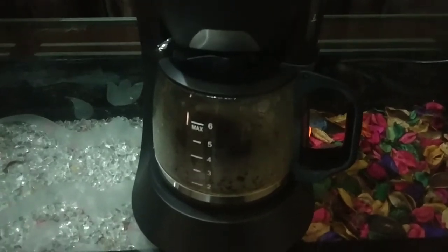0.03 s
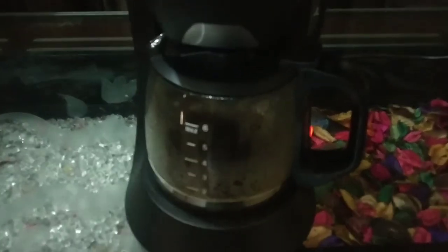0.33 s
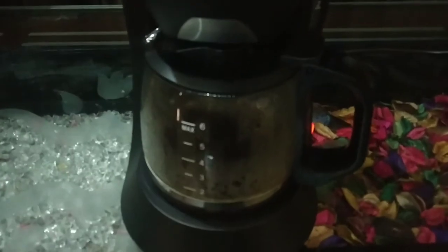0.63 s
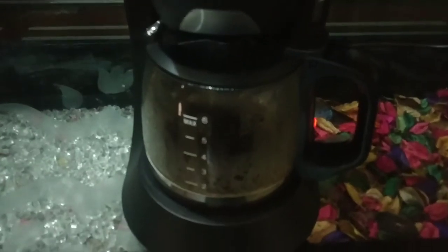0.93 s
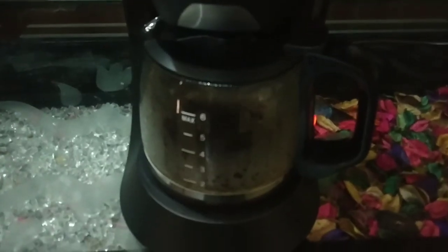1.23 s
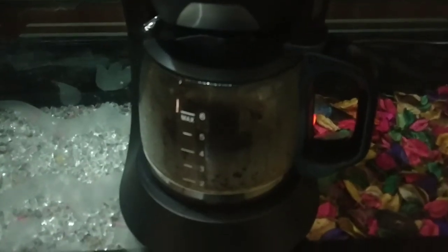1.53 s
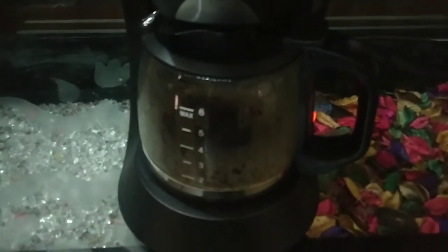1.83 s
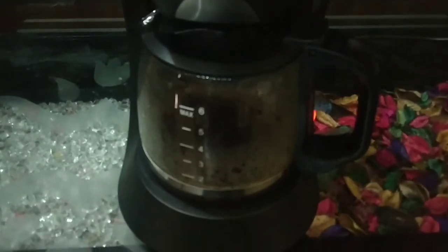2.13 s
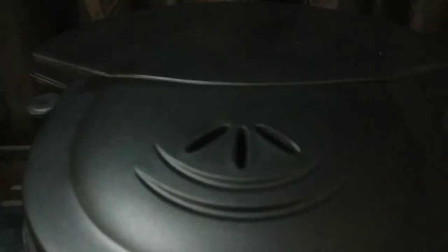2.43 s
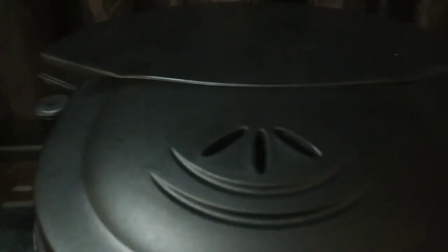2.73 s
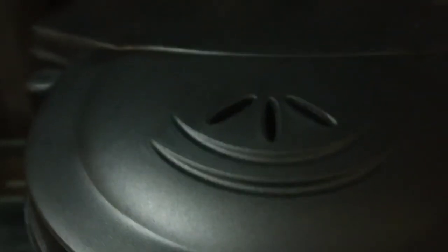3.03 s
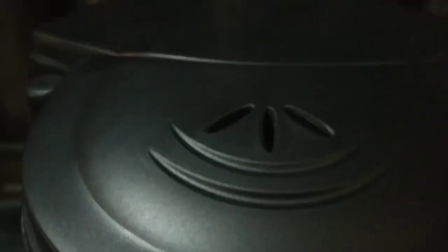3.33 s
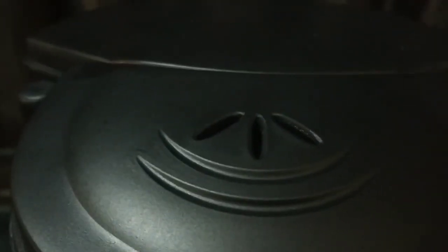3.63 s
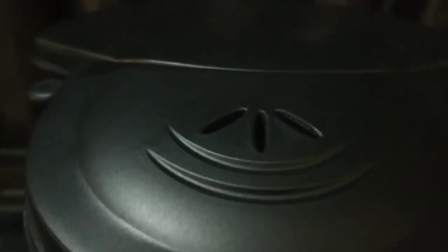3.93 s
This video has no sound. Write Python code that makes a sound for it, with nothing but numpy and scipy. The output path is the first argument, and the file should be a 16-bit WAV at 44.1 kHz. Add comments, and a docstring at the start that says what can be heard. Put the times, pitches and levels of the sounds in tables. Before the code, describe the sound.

A drip coffee maker spits, drips and simmers, heard close beside its glass carafe in a small room, with soft steam hisses and muffled gurgles. At about 2.3 seconds the sound breaks briefly and resumes above the lid: a louder boiling rumble with quick, irregular thumps. Short steam puffs come from 3 to 4 seconds. Fingers lightly tap and brush the microphone on the left near 1 and 2.6 seconds.

```python
"""Hot water spits and simmers into the filter of a drip coffee maker, heard beside the carafe in a small
room. Each bubble rings as a damped oscillator, and its spray excites the modes of the glass.
After a short break the listener is above the lid: collapsing steam bubbles thump in the tank over a
boiling rumble, and turbulent steam puffs through the vents. Now and then fingers brush and tap the
left microphone port."""
import sys
import numpy as np
from scipy import signal
from scipy.fft import rfft, irfft, next_fast_len
from scipy.io import wavfile
from scipy.ndimage import map_coordinates

SR = 44100
rng = np.random.default_rng(int(sys.argv[2]) if len(sys.argv) > 2 else 0)


def to_wav(sig):
    """Store sig (one row per channel, or 1-D mono) as 16-bit WAV at the path in sys.argv[1].

    Samples outside -1..1 are clipped; the rate is SR.
    """
    pcm = np.clip(np.atleast_2d(sig), -1, 1) * 32767
    pcm = np.round(pcm).astype(np.int16)
    wavfile.write(sys.argv[1], SR, pcm.T)  # frames by channels


N = 176400
TIME_S = np.arange(N) / SR
CARAFE_END_S, LID_START_S = 2.323, 2.368
ONSET_S, LOW_CUT_HZ = 0.0015, 194  # of gurgles and thumps


def amp(db):
    return 10 ** (np.asarray(db) / 20)

def unit_rms(x):
    return x / np.sqrt(np.mean(x ** 2) + 1e-20)

def unit_peak(x):
    return x / np.abs(x).max()

def pan(left_over_right_db):
    return amp(np.array([[left_over_right_db], [-left_over_right_db]]) / 2)

def on_log_axis(points, hz):
    knots_hz, values = np.transpose(points)
    return np.interp(np.log(hz + 1), np.log(knots_hz + 1), values)

def gain_curve(points):
    return amp(np.interp(TIME_S, *np.transpose(points)))

def add(track, start_s, x):
    part = track[:, max(0, round(start_s * SR)):][:, :x.shape[-1]]
    part += x[..., :part.shape[1]]

def filtered(x, response):
    size = next_fast_len(N + SR // 2)
    return irfft(rfft(x, size) * response(np.fft.rfftfreq(size, 1 / SR)), size)[..., :N]

def low_cut(x, hz, order=2):
    return signal.sosfilt(signal.butter(order, hz, "highpass", fs=SR, output="sos"), x)

def wobble(knots_per_s):
    """Random modulation: a spline through Gaussian values."""
    return map_coordinates(rng.standard_normal(2000), [np.arange(N) * knots_per_s / SR], mode="wrap")

def resonate(x, modes):
    """Forced vibration: each mode adds a second-order resonance to the direct sound."""
    def response(f):
        return sum(amp(db) * 1j * f * width / (hz ** 2 - f * f + 1j * f * width)
                   for hz, width, db in modes)
    return x + filtered(x, response)

# Likeness of left and right: frequency_hz, correlation
COHERENCE = [(750, 0.9), (7000, 0)]
def seethe(spectrum, pops_per_s, pop_db, pan_db):
    """Shot noise plus Gaussian noise, shaped into a partly coherent stereo rush of rms 1."""
    pops = (rng.random((2, N)) < pops_per_s / SR) * rng.standard_normal((2, N))
    source = rng.standard_normal((2, N)) + amp(pop_db) * unit_rms(pops)
    def response(hz):
        angle = np.arccos(on_log_axis(COHERENCE, hz)) / 2
        bass_rolloff = np.minimum(1, hz / spectrum[0][0]) ** 7.4
        return amp(on_log_axis(spectrum, hz)) * bass_rolloff * [np.cos(angle), np.sin(angle)]
    mid, side = filtered(source, response)
    return unit_rms(np.array([mid + side, mid - side]) * pan(pan_db))

def swells(rows, rise, fall):
    """Trapezoidal envelopes; rise and fall are shares of each duration."""
    envelope = np.zeros(N)
    for start_s, duration_s, db in rows:
        progress = (TIME_S - start_s) / duration_s
        envelope += amp(db) * np.clip(np.minimum(progress / rise, (1 - progress) / fall), 0, 1)
    return envelope

# Reverberation time: frequency_hz, t60_s
ROOM_DECAY = [(200, 0.069), (9000, 0.25)]
def room(x, tail_db=-9.5):
    """Reverberation: a diffuse, exponentially decaying tail joins the direct sound."""
    hz, t, noise = signal.stft(rng.standard_normal((2, SR // 3)), SR, nperseg=256)
    decay = amp(-60 * t / on_log_axis(ROOM_DECAY, hz)[:, None])
    tail = signal.istft(noise * decay, SR, nperseg=256)[1]
    return x + amp(tail_db) * signal.fftconvolve(x, tail / np.linalg.norm(tail[0]), axes=1)[:, :N]

# Hiss spectrum: frequency_hz, gain_db
HISS_SPECTRUM = [(9000, -18), (14000, 16)]
def high_hiss(level_db=-51, fall_db_per_s=4):
    """Exponential decay: a faint band of treble noise dies slowly away."""
    gain = amp(level_db - fall_db_per_s * TIME_S)
    return gain * seethe(HISS_SPECTRUM, pops_per_s=830, pop_db=-22, pan_db=7)

# Strength of the muffled boil: time_s, level_db
HOUSING_ENVELOPE = [(0, -45), (.4, -41.5), (1.98, -41.5), (2.2, -35), (2.32, -42.5)]
# Its spectrum: frequency_hz, gain_db
HOUSING_SPECTRUM = [(150, -20), (195, -5.5), (430, -3.5), (560, -19.5), (730, -10.5), (1200, -29.5),
                    (2400, -62)]
def muffled_boil():
    """Transmission loss: the housing passes mainly the low frequencies of the boil."""
    gain = gain_curve(HOUSING_ENVELOPE) * amp(1.3 * wobble(16))
    return gain * seethe(HOUSING_SPECTRUM, pops_per_s=130, pop_db=-3.5, pan_db=0)

# Simmering water: frequency_hz, gain_db
SIMMER_SPECTRUM = [(600, -32), (930, 1), (1120, -6), (1380, -2.5), (1690, 2), (1900, -11.5), (2400, -5.5),
                   (4700, -3), (6000, -9.5), (10000, -20)]
def simmer(level_db=-44):
    """Incoherent summation: tiny pops merge into a flickering rush."""
    gain = amp(level_db + wobble(40.5))
    return gain * seethe(SIMMER_SPECTRUM, pops_per_s=220, pop_db=-2.5, pan_db=4.5)

# Fizz in the tank: frequency_hz, gain_db
FIZZ_SPECTRUM = [(2000, -7), (6000, 1.5), (7000, -10.5), (15500, -27.5)]
# Resonances under the lid: frequency_hz, bandwidth_hz, gain_db
LID_MODES = [(2560, 190, 8.5), (5450, 150, 2)]
def lid_fizz(gain_db=-18.5):
    """Cavity resonance: the space under the lid colours a fine fizz."""
    gain = amp(gain_db + wobble(8.7))
    fizz = seethe(FIZZ_SPECTRUM, pops_per_s=260, pop_db=-2.5, pan_db=4)
    return gain * unit_rms(resonate(fizz, LID_MODES))

# Boiling in the tank: frequency_hz, gain_db
RUMBLE_SPECTRUM = [(175, -12), (245, -0.5), (335, -0.5), (460, -10), (585, 5), (720, -1), (1150, -23.5),
                   (3500, -45)]
def tank_rumble():
    """Superposition: countless small collapses sum to a low rumble."""
    return amp(wobble(45)) * seethe(RUMBLE_SPECTRUM, pops_per_s=400, pop_db=-3, pan_db=-1.8)

# Puffs at the spout: start_s, duration_s, level_db
SPOUT_JETS = [(.22, 0.21, -39.5), (1.318, 0.11, -42.5), (1.78, 0.23, -39.5), (2.01, 0.58, -39.5)]
# Their spectrum: frequency_hz, gain_db
SPOUT_SPECTRUM = [(350, -1.5), (900, -4), (2000, -9), (5300, -8.5), (10000, -32)]
def spout_steam():
    """Turbulence: steam leaves the spout as fluttering broadband noise."""
    envelope = swells(SPOUT_JETS, rise=0.17, fall=0.21) * amp(2.5 * wobble(90))
    return envelope * seethe(SPOUT_SPECTRUM, pops_per_s=500, pop_db=-3, pan_db=4.5)

# Puffs at the vents: start_s, duration_s, level_db
VENT_JETS = [(3.06, 0.12, -35), (3.315, 0.086, -36), (3.43, 0.13, -38), (3.567, 0.061, -36.5),
             (3.68, 0.054, -30.5), (3.97, 0.06, -39)]
# Their spectrum: frequency_hz, gain_db
VENT_SPECTRUM = [(1200, 0), (1900, -4), (4800, -2.5), (13000, -19.5)]
# Vent resonances: frequency_hz, bandwidth_hz, gain_db
VENT_MODES = [(1375, 170, 9), (3710, 75, 13), (4380, 126, 15.5)]
def vent_steam():
    """Flow-excited resonance: jets of steam drive the modes of the vents."""
    jet = seethe(VENT_SPECTRUM, pops_per_s=310, pop_db=-8.5, pan_db=5)
    return swells(VENT_JETS, rise=0.17, fall=0.77) * unit_rms(resonate(jet, VENT_MODES))

def bubble_tones(rows, t60_s=0.03):
    """Bubble resonance: each pulsating bubble radiates a damped sinusoid."""
    out, t = np.zeros((2, N)), np.arange(SR // 10) / SR
    envelope = amp(-60 * t / t60_s) * (1 - np.exp(-t / ONSET_S))
    for start_s, db, hz in rows:
        add(out, start_s, amp(db) * unit_peak(envelope * np.sin(2 * np.pi * hz * t)))
    return out

# Bubbles behind the housing: start_s, level_db, pitch_hz
LARGE_BUBBLES = [(.206, -31.5, 905), (.258, -29.5, 895), (.401, -28.5, 654), (2.075, -28, 585),
                 (2.183, -23.5, 353), (2.213, -24.5, 686), (2.228, -22, 370)]
def gurgles():
    """Minnaert resonance: larger bubbles ring lower, dull behind the plastic."""
    return low_cut(bubble_tones(LARGE_BUBBLES), LOW_CUT_HZ)

def tank_bubbles(per_s=32, gain_db=10.5, lowest_hz=512):
    """Size scaling: over one octave, smaller bubbles ring higher and tend to be weaker."""
    draws = rng.random((int(per_s * N / SR), 3))
    return bubble_tones([(when * N / SR, gain_db - 10 * (weakness + octave), lowest_hz * 2 ** octave)
                         for when, weakness, octave in draws])

# Taps on the port: start_s, level_db, pitch_hz
FINGER_TAPS = [(0.9353, -4, 427), (2.5982, -6, 650), (2.6997, -7.5, 810)]
# Strokes across it: start_s, duration_s, level_db
FINGER_STROKES = [(.965, 0.22, -33), (1.432, 0.0062, -34.5), (2.548, 0.081, -37)]
# Sliding skin: frequency_hz, gain_db
FRICTION_SPECTRUM = [(3000, -5), (7000, 0.5), (15500, -4.5)]
def fingers(tap_t60_s=0.003):
    """Impact and friction: skin taps and brushes unevenly at the left microphone port."""
    out, t = np.zeros((2, N)), np.arange(SR // 40) / SR
    for start_s, db, hz in FINGER_TAPS:
        knock = np.sin(2 * np.pi * hz * t) + 0.11 * rng.standard_normal(len(t))
        knock = low_cut(knock * amp(-60 * t / tap_t60_s), hz / 2)
        add(out, start_s, amp(db - 13) * unit_peak(knock) * pan(23))
    grip = swells(FINGER_STROKES, rise=0.2, fall=0.25) * amp(1.6 * wobble(70))
    return out + grip * seethe(FRICTION_SPECTRUM, pops_per_s=2800, pop_db=-3, pan_db=22)

def drip_events(per_s=32, level_db=-35, puff_boost_db=4, lowest_hz=1288, octaves=1.4, spray_db=-12):
    """Random point process: rows of small drips, stronger during a puff at the spout."""
    draws = rng.random((int(per_s * CARAFE_END_S), 3)) * [CARAFE_END_S, 1, 1]
    for start_s, weakness, pitch in draws:
        puffing = any(onset < start_s < onset + duration for onset, duration, _ in SPOUT_JETS)
        db = level_db - 10 * weakness + puff_boost_db * puffing
        yield start_s, db, lowest_hz * 2 ** (octaves * pitch ** 2), spray_db

# Bursts at the spout: start_s, level_db, pitch_hz, spray_gain_db
SPOUT_BURSTS = [(.028, -24.5, 1290, -7), (.363, -23, 1417, -3.5), (.5125, -26.5, 1456, -13.5),
                (.578, -25, 1300, -8.5), (.8078, -19.5, 1344, -8.5), (1.0724, -24, 1255, -3),
                (1.349, -23.5, 1260, -11), (1.3805, -22.5, 1640, -23.5), (1.4707, -23.5, 1420, -27),
                (1.6192, -26, 1386, -11.5), (1.6835, -15, 1447, -15.5), (1.8507, -23, 1670, -5.5),
                (1.9317, -21, 1670, -16.5), (2.0178, -27.5, 1610, -6.5)]
# Their spray: frequency_hz, gain_db
SPRAY_SPECTRUM = [(1300, 6), (2600, 0), (6300, 2.5), (10000, -26)]
# Carafe resonances: frequency_hz, bandwidth_hz, gain_db
GLASS_MODES = [(5310, 220, 10), (5676, 92, 2), (7194, 86, 9.5)]
def spits(attack_s=0.003, hold_s=0.0031, t60_s=0.02, tone_db=-5):
    """Transient excitation: each burst or drip rings at its own pitch; its spray rings the glass."""
    tones, splashes, t = np.zeros((2, N)), np.zeros((2, N)), np.arange(SR // 20) / SR
    rise = np.sin(np.pi / 2 * np.minimum(t / attack_s, 1)) ** 2
    envelope = rise * amp(-60 * np.maximum(t - attack_s - hold_s, 0) / t60_s)
    spray = seethe(SPRAY_SPECTRUM, pops_per_s=3400, pop_db=-4, pan_db=15.5)
    for start_s, db, hz, spray_db in [*SPOUT_BURSTS, *drip_events()]:
        phase_drift = 0.085 * np.cumsum(rng.standard_normal(len(t)))
        add(tones, start_s, amp(db + tone_db) * envelope * np.sin(2 * np.pi * hz * t + phase_drift))
        splash = spray[:, round(start_s * SR):][:, :len(t)]
        add(splashes, start_s, amp(db + spray_db) * envelope * splash)
    return tones + resonate(splashes, GLASS_MODES)

# Collapsing steam bubbles: start_s, level_db, lowest_mode_gain_db
COLLAPSES = [(2.4326, -20, -2.5), (2.4938, -14.5, -5.5), (2.5622, -10, -6), (2.5832, -12, -7.5),
             (2.6692, -10.5, -0.5), (2.7325, -7, -7.5), (2.8772, -9.5, -10.5), (2.8955, -10.5, -2.5),
             (2.9443, -8, -7), (3.0037, -8.5, -15), (3.091, -12, -6), (3.1685, -5.5, -7.5),
             (3.2555, -6, -6.5), (3.412, -16, -24), (3.4506, -6, -1.5), (3.6182, -8.5, -11),
             (3.688, -15, 15), (3.8192, -9, -3.5), (3.826, -13.5, -27), (3.9372, -6.5, -8),
             (3.9692, -8.5, -8.5)]
# Tank resonances: frequency_hz, gain_db, t60_s
TANK_MODES = [(281.7, 6, 0.025), (600, 7, 0.025), (889, -8.5, 0.022), (2577, -23.5, 0.035),
              (5500, -38, 0.028)]
def thumps(stretch_per_db=0.05):
    """Modal ringing: each collapse strikes the tank, slightly detuned; strong ones ring longer."""
    out, t = np.zeros((2, N)), np.arange(SR // 10) / SR
    mean_db = np.mean([db for _, db, _ in COLLAPSES])
    for start_s, db, lowest_mode_db in COLLAPSES:
        age = t / np.exp(stretch_per_db * max(db - mean_db, 0))
        detune = 1 + 0.03 * rng.standard_normal(len(TANK_MODES))
        ring = np.zeros(len(t))
        for k, (hz, mode_db, t60_s) in enumerate(TANK_MODES):
            gain = amp(mode_db) * (-amp(lowest_mode_db) if k == 0 else 1)  # lowest mode in antiphase
            ring += gain * np.sin(2 * np.pi * hz * detune[k] * t) * amp(-60 * age / t60_s)
        ring = low_cut(ring * (1 - np.exp(-age / ONSET_S)), LOW_CUT_HZ, order=3)
        add(out, start_s, amp(db) * unit_peak(ring) * pan(-1.9))
    return out

def beside_carafe(fade_s=0.017):
    """Direct and reverberant sound: spits and gurgles excite the room over a bed of noise."""
    bed = muffled_boil() + simmer() + spout_steam() + high_hiss()
    fade_out = np.clip((CARAFE_END_S - TIME_S) / fade_s, 0, 1)
    return (bed + room(spits() + gurgles())) * fade_out

# Strength of the boil above the lid: time_s, level_db
TANK_ENVELOPE = [(2.36, -36.5), (3.0, -27)]
def above_lid(fade_s=0.18, left_lag_s=0.000098):
    """Arrival-time difference: the tank reaches the left port later; the vent steam has no lag."""
    fade_in = np.sqrt(np.clip((TIME_S - LID_START_S) / fade_s, 0, 1))
    boil = tank_rumble() + tank_bubbles() + fade_in * lid_fizz()
    steam = vent_steam()
    tank = fade_in * gain_curve(TANK_ENVELOPE) * boil + thumps()
    delay_s = np.array([[left_lag_s], [0]])
    return steam + filtered(tank, lambda hz: np.exp(-2j * np.pi * hz * delay_s))

def scene():
    """Superposition: two listening positions in turn, with finger noise on both."""
    return beside_carafe() + above_lid() + fingers()

def record(dry):
    """Band limiting: the sound has no treble above about 16 kHz."""
    return filtered(dry, lambda hz: hz < 16050)


dry = scene()
out = record(dry)
to_wav(out)
```